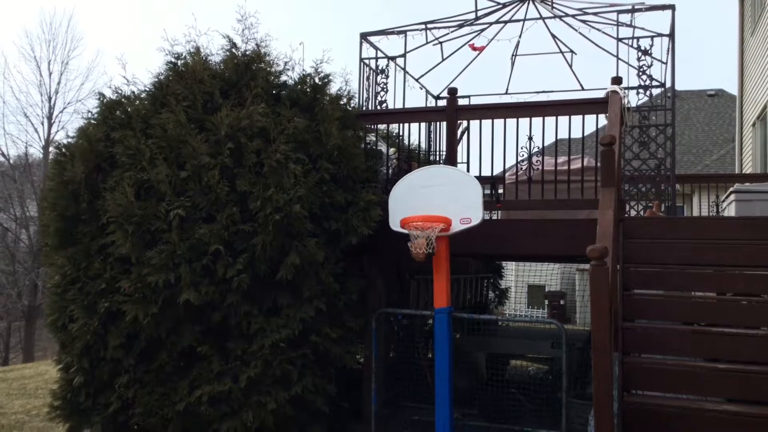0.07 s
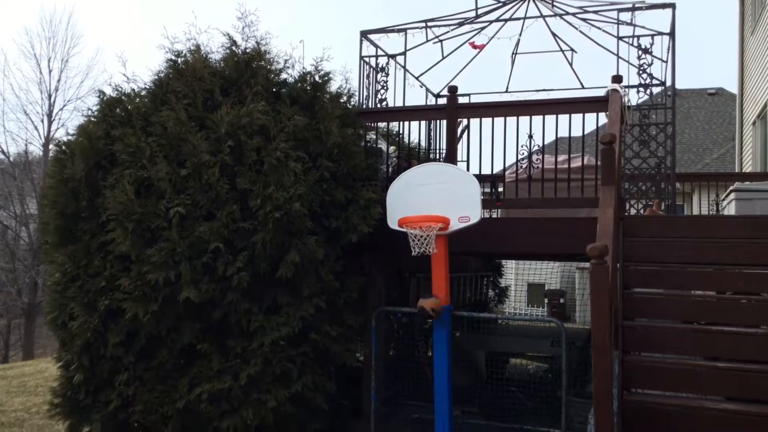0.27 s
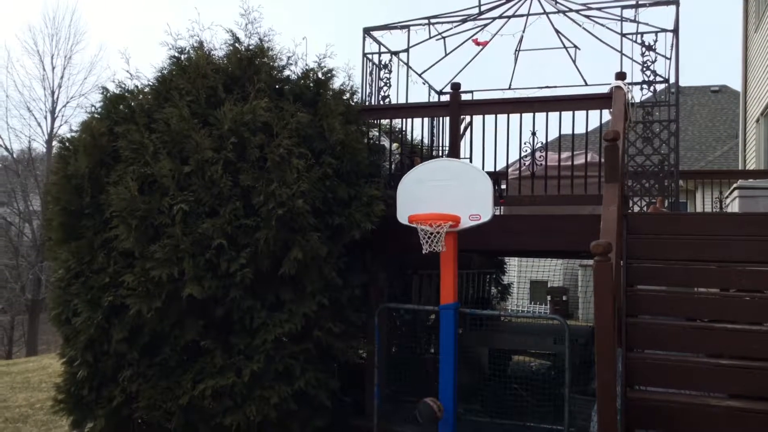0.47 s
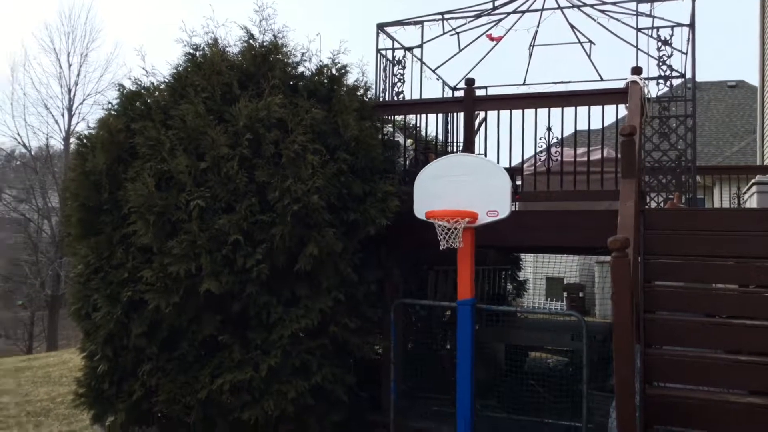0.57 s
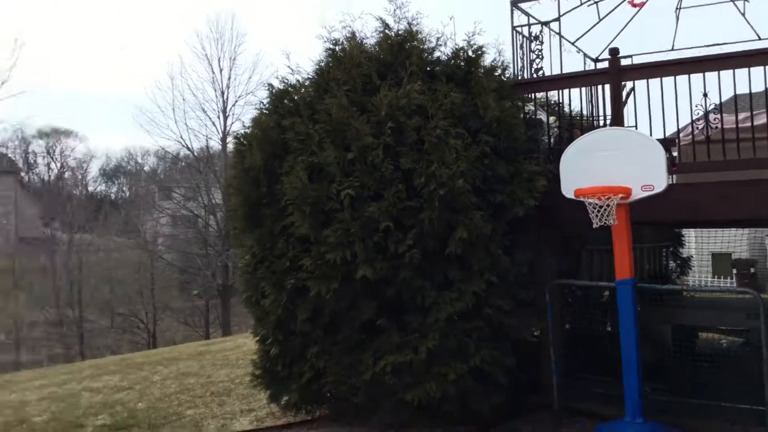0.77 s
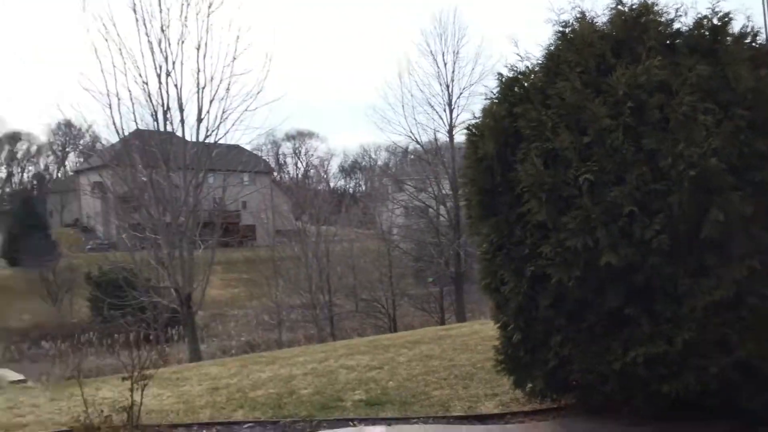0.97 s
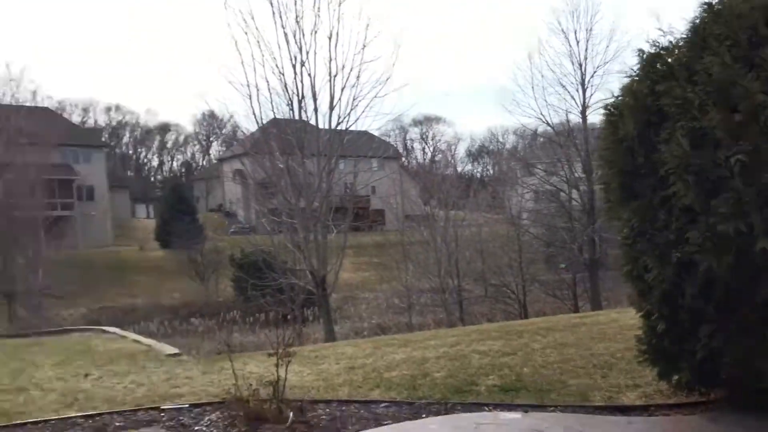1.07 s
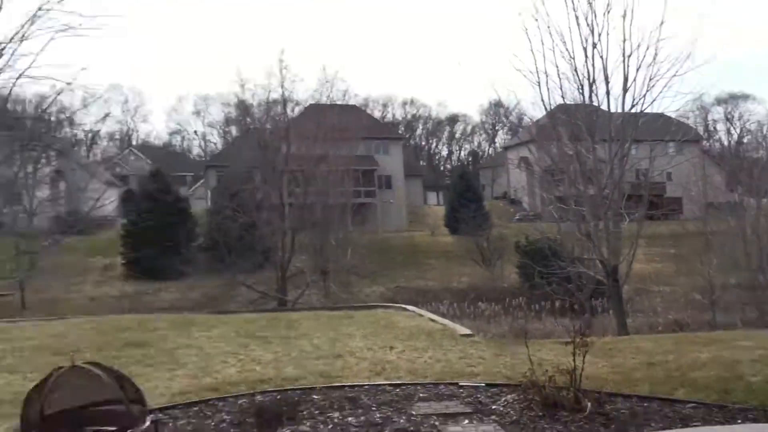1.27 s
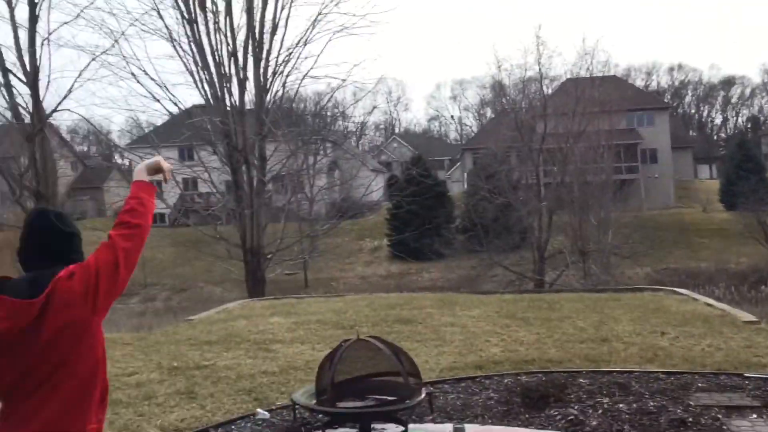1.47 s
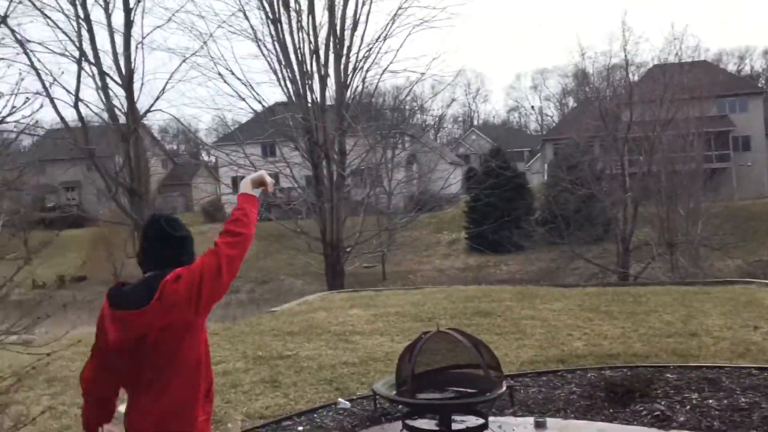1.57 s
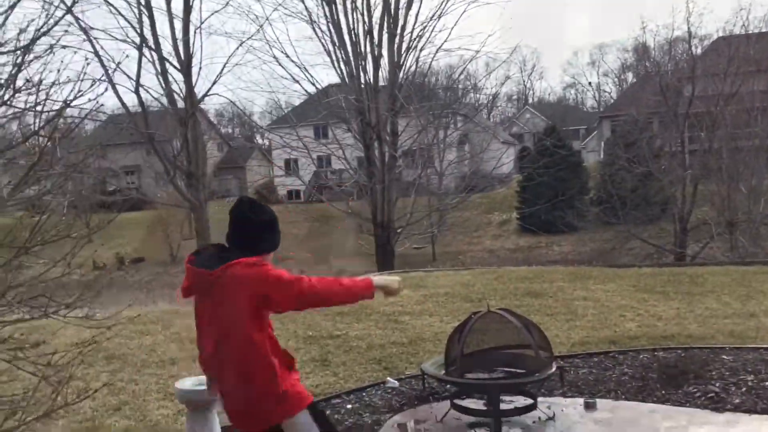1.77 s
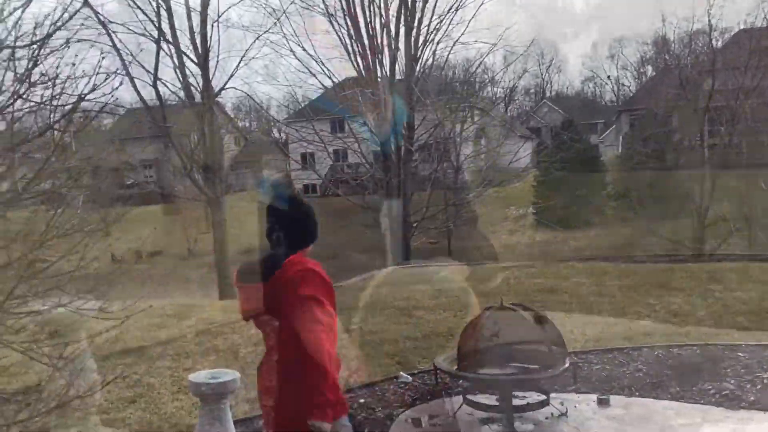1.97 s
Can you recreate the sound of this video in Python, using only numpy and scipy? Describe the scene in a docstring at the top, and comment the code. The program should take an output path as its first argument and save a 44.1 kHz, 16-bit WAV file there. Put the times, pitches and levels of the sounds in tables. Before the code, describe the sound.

A small ball bounces on a patio: a hollow plastic hoop booms and rattles, the ball knocks its post, then hits the paving hard and bounces three more times, softer, with gritty footsteps, in an open yard.

```python
"""Toy basketball bouncing on a patio

A small basketball drops from a hollow plastic hoop still rumbling from the shot, knocks its post and
bounces four times in an open yard, hard then softly: sagging thumps, crackling slaps, ringing modes.
House walls return low-passed copies; near and far reflections are clumped noise tails.
Clothes, shoes and grit are shaped noise over a low outdoor rumble with a faint tone.
"""
import sys
import numpy as np
from scipy import signal
from scipy.fft import rfft, irfft
from scipy.io import wavfile
from scipy.ndimage import uniform_filter1d

SR = 44100
rng = np.random.default_rng(int(sys.argv[2]) if len(sys.argv) > 2 else 0)


def materialize(psi):
    """Save the field psi as 16-bit PCM at rate SR to the path in sys.argv[1].

    A 1-D psi becomes a single channel; in a 2-D psi each row is a channel.
    """
    bounded = np.clip(np.atleast_2d(psi).T, -1, 1)
    quanta = np.round(bounded * 32767).astype(np.int16)
    wavfile.write(sys.argv[1], SR, quanta)


N = 89390  # samples


def amp(db):
    """Linear gain from dB."""
    return 10 ** (np.asarray(db) / 20)


def unit(x):
    """Scale to unit RMS."""
    return x / np.sqrt(np.mean(x ** 2) + 1e-20)


def read(points, hz):
    """Interpolate the second column over log frequency, holding the end values."""
    f, value = np.transpose(points)[:2]
    return np.interp(np.log(hz + 1), np.log(f), value)


def add(mix, s, sound):
    """Mix a sound in at s seconds, cut at the end of the mix."""
    part = mix[max(round(s * SR), 0):][:len(sound)]
    part += sound[:len(part)]


def colour(x, points):
    """Minimum-phase filter with the given spectrum (f/Hz, gain/dB)."""
    size = 4096
    gain_db = read(points, abs(np.fft.fftfreq(size, 1 / SR)))
    log_gain = np.log(amp(gain_db))
    fir = np.fft.ifft(np.exp(np.conj(signal.hilbert(log_gain)))).real
    return signal.fftconvolve(x, fir[:size // 2])[:len(x)]


def tail(bands):
    """Clumped random reflections, each band (f/Hz, level/dB, t60/s) dying at its own speed."""
    t, hz = np.arange(SR) / SR, np.fft.rfftfreq(SR, 1 / SR)
    clump_db = 2 * unit(uniform_filter1d(rng.standard_normal(SR), size=50))
    reflections = unit(amp(clump_db)) * rng.choice([-1., 1.], SR)
    spectrum = rfft(reflections) / np.sqrt(SR / 100)
    centres_hz = [row[0] for row in bands]
    out = np.zeros(SR)
    # triangular, overlapping bands in log frequency
    for share, (_, db, t60_s) in zip(np.eye(len(bands)), bands):
        weight = read(list(zip(centres_hz, share)), hz)
        out += irfft(spectrum * weight, SR) * amp(db - 60 * t / t60_s)
    return out


def ring(modes, rise_s=0.00025):
    """Struck modes (f/Hz, level/dB, t60/s): decaying sines of random phase."""
    t = np.arange(SR) / SR
    out = np.zeros(SR)
    for hz, db, t60_s in modes:
        out += amp(db - 60 * t / t60_s) * np.sin(2 * np.pi * (hz * t + rng.random()))
    return (1 - np.exp(-t / rise_s)) * out


def air():
    """Lumpy low outdoor rumble of shaped noise, a narrow-band wavering hum and a faint passing tone."""
    # rumble spectrum: f/Hz, relative density/dB per Hz
    rumble_spectrum = [(25, -40.5), (50, -10.5), (80, -6), (120, -3), (165, -10), (230, -17.5),
                       (420, -30.5), (800, -35), (1900, -42), (3100, -54), (6000, -61.5), (11000, -57.5),
                       (15000, -58)]
    # rumble level: t/s, level/dB
    rumble_level = [(0, -46.5), (1.0, -48.5), (1.5, -51), (2.03, -53)]
    hum_hz, hum_width_hz, hum_db = 107.5, 5.1, -1.5  # level relative to the whole wash
    tone_hz, tone_centre_s, tone_half_length_s, tone_db = 1006, 0.3, 0.15, -63.5
    swell_db = 0.7
    t, hz = np.arange(N) / SR, np.fft.rfftfreq(N, 1 / SR)
    wash_noise, hum_noise, swell_noise = rfft(rng.standard_normal((3, N)))

    slow = unit(irfft(swell_noise * np.exp(-(hz / 18) ** 2), N))
    swells = unit(amp(swell_db * slow))
    wash = unit(irfft(wash_noise * amp(read(rumble_spectrum, hz)), N))
    low = irfft(rfft(wash) / (1 + (hz / 400) ** 4), N)
    hum_band = np.exp(-((hz - hum_hz) / hum_width_hz) ** 2 / 2)
    hum = unit(irfft(hum_noise * hum_band, N))
    rumble = wash - low + swells * (low + amp(hum_db) * hum)  # only the low part swells

    tone_shape = np.exp(-((t - tone_centre_s) / tone_half_length_s) ** 4)
    tone = amp(tone_db) * tone_shape * np.sin(2 * np.pi * tone_hz * t)
    return amp(np.interp(t, *np.transpose(rumble_level))) * rumble + tone


def boom():
    """The flexing backboard's low boom sinks to its resting pitch as its swing dies down."""
    level_db, t60_s, rise_s = -29.5, 0.73, 0.023
    rest_hz, sag_hz, sag_s = 166.9, 56.6, 0.031
    t = np.arange(N) / SR
    phase = 2 * np.pi * np.cumsum(rest_hz + sag_hz * np.exp(-t / sag_s)) / SR
    return amp(level_db - 60 * t / t60_s) * (1 - np.exp(-t / rise_s)) * np.sin(phase)


def hoop():
    """Blows ring and rattle the hollow plastic stand; the falling ball knocks its post."""
    # blows: t/s, mode gain/dB, rattle gain/dB
    blows = [(.001, -42, -7.5), (.018, -33, -27), (0.144, -57, -45.5), (.646, -32, -19.5)]
    # hollow hoop modes: f/Hz, relative level/dB, t60/s
    hoop_modes = [(200.7, 3.5, 0.36), (244.3, -1, 0.28), (314, 5, 0.17), (335.5, -2.5, 0.25),
                  (365, 2, 0.27), (407, -6, 0.32), (558.2, -8, 0.24), (675, -16.5, 0.33), (805, -3, 0.14),
                  (859.5, -5, 0.11), (936, -5.5, 0.12), (1061, -14.5, 0.21), (1330, -18, 0.087)]
    # rattle bands: f/Hz, relative level/dB, t60/s
    rattle_bands = [(39.7, -2, .4), (80, 4.5, 0.67), (167, 27, 0.7), (361, 16, 0.52), (540, 14.5, 0.3),
                    (930, 10, 0.35), (2180, 1, 0.45), (4180, -3.5, 0.15), (7750, -13.5, 0.29),
                    (11200, -10.5, 0.14), (15500, -21, 0.21)]
    # dull knock bands: f/Hz, relative level/dB, t60/s
    knock_bands = [(45, -11, 0.22), (99.3, 21.5, 0.33), (243, 14, 0.35), (433, 9, 0.29), (650, 8, 0.11),
                   (1050, 3, 0.13), (1770, -6.5, 0.18), (2630, -9.5, 0.16), (3960, -12.5, 0.1),
                   (7500, -24, .1), (11300, -19.5, 0.17), (15200, -32, .1)]
    # hollow post modes: f/Hz, relative level/dB, t60/s
    post_modes = [(588, 3.5, 0.086), (665, 0.5, 0.11), (763, -11, .12), (1790, -2, 0.042),
                  (1870, -11, 0.071), (2417, -8, 0.031), (3490, -21, 0.066)]
    knock_s, knock_db, post_db, knock_rise_s = .3222, -9, -37.5, 0.0048
    out, t = np.zeros(N), np.arange(SR) / SR
    for s, modes_db, rattle_db in blows:
        add(out, s, amp(modes_db) * ring(hoop_modes) + amp(rattle_db) * tail(rattle_bands))
    knock = amp(knock_db) * tail(knock_bands) + amp(post_db) * ring(post_modes)
    add(out, knock_s, knock * (1 - np.exp(-t / knock_rise_s)))
    return out


def rustles():
    """Scuffs of shoes and cloth as swells of grainy noise, and grit ticks as filtered impulses."""
    # rustles: peak t/s, rise/s, fall/s, scrape level/dB, swish level/dB
    swells = [(0.082, 0.013, 0.026, -63, -57), (0.144, 0.0036, 0.0096, -53.5, -57.5),
              (0.211, 0.027, 0.044, -62.5, -61.5), (0.398, 0.0058, 0.011, -65, -63.5),
              (0.883, 0.0017, 0.0061, -60.5, -74.5), (.915, 0.018, 0.042, -78, -75),
              (1.172, 0.013, 0.02, -63.5, -75), (1.237, 0.016, 0.026, -64.5, -63.5),
              (1.633, 0.0075, 0.019, -63, -63.5), (1.785, 0.089, 0.028, -71, -74),
              (1.938, 0.014, 0.0051, -65.5, -75.5), (2.027, 0.0052, .01, -60, -61)]
    # grit ticks: t/s, impulse level before colouring/dB
    tick_events = [(.3925, -34.5), (1.2925, -45.5), (1.611, -46), (2.0, -49)]
    # scrape spectrum: f/Hz, relative gain/dB
    scrape_spectrum = [(150, -14), (600, 8.5), (1500, 7.5), (3000, -5), (5000, -15.5), (7400, -37),
                       (15500, -12)]
    # swish and tick spectrum: f/Hz, gain/dB
    swish_spectrum = [(1500, -13.5), (5000, 5), (7400, -3.5), (9500, 6), (12000, 10), (14000, 0),
                      (15500, -15)]
    grain_db = 2
    t = np.arange(N) / SR
    scrape, swish, ticks = np.zeros((3, N))
    for s, rise_s, fall_s, scrape_db, swish_db in swells:
        width_s = np.where(t < s, rise_s, fall_s)
        shape = np.exp(-abs((t - s) / width_s) ** 1.35 / 2)
        scrape += amp(scrape_db) * shape
        swish += amp(swish_db) * shape
    for s, db in tick_events:
        add(ticks, s, amp(db) * np.ones(1))
    grain = amp(grain_db * unit(uniform_filter1d(rng.standard_normal(N), size=90)))
    scrape_noise, swish_noise = grain * rng.standard_normal((2, N))
    scrape = scrape * unit(colour(scrape_noise, scrape_spectrum))
    swish = swish * unit(colour(swish_noise, swish_spectrum))
    return scrape + swish + colour(ticks, swish_spectrum)


def taps():
    """Gritty taps and crunches, mostly shoes on paving: noise bursts resonating at their own pitch."""
    # taps: t/s, relative level/dB, f/Hz, grit level relative to body/dB, t60/s
    tap_events = [(.208, -24, 2740, -13, 0.13), (.557, -24.5, 507, -12, 0.048),
                  (.578, -28.5, 790, -12, 0.032), (0.879, -24.5, 1740, -7, 0.043),
                  (0.91, -28.5, 860, -22, 0.095), (1.158, -32, 3010, -9, 0.034),
                  (1.18, -30.5, 1214, -2, 0.043), (1.199, -20, 726, -16, 0.058),
                  (1.223, -18.5, 1310, -5.5, 0.034), (1.245, -25.5, 1100, -0.5, 0.03),
                  (1.611, -30.5, 1270, -6, 0.052), (1.633, -20, 1370, -6, 0.039)]
    # grit spectrum: f/Hz, relative gain/dB
    grit_spectrum = [(400, 8), (1500, 15), (3300, 3), (5200, -33), (7400, -45), (15500, -15)]
    width_hz, rise_s = 220, 0.00096
    out, t = np.zeros(N), np.arange(SR // 5) / SR
    for s, db, hz, grit_db, t60_s in tap_events:
        grit = rng.standard_normal(len(t)) * rng.exponential(1, len(t))
        body = signal.lfilter(*signal.iirpeak(hz, hz / width_hz, fs=SR), grit)
        shape = amp(db - 60 * t / t60_s) * (1 - np.exp(-t / rise_s))
        add(out, s, 0.037 * shape * (unit(body) + amp(grit_db) * unit(colour(grit, grit_spectrum))))
    return out


def thump(hz, swell_s, decay_s, overtone_db):
    """A soft body pushes the air: a few low cycles sagging to hz, with an overtone at 1.5 times."""
    bend, bend_s, overtone_ratio = 0.31, 0.0079, 1.5  # starts 31 % sharp
    t = np.arange(SR // 2) / SR
    phase = 2 * np.pi * np.cumsum(hz * (1 + bend * np.exp(-t / bend_s))) / SR - np.pi / 2
    shape = (1 - np.exp(-(t / swell_s) ** 2)) * np.exp(-t / decay_s)
    tones = np.sin(phase) + amp(overtone_db) * np.sin(overtone_ratio * phase)
    return shape / shape.max() * tones


def steps():
    """Soft low thuds of feet, as quiet thumps."""
    # footfalls: t/s, level/dB, settled f/Hz
    footfalls = [(.280, -43, 185), (1.528, -38.5, 103), (1.93, -49, 169)]
    out = np.zeros(N)
    for s, db, hz in footfalls:
        add(out, s, amp(db) * thump(hz, swell_s=.011, decay_s=0.0069, overtone_db=-21.5))
    return out


def slap(bright_db, crackle_db):
    """A sharp first touch, then crackle while the rubber flattens on the grit."""
    # rubber on paving: f/Hz, relative gain/dB
    rubber_spectrum = [(100, -2), (400, -3), (900, 2.5), (1700, 3.5), (2800, -7.5), (5200, 1.5),
                       (7400, -11), (8700, 0.5), (12500, -7.5), (15500, -25)]
    contact_s = 0.0037
    t = np.arange(SR // 10) / SR
    grit = rng.choice([-1., 1.], len(t)) * rng.exponential(1, len(t))
    contact = amp(crackle_db) / 2 * grit * np.exp(-(t / contact_s) ** 4)
    contact[0] = 1  # first touch
    rubber = colour(contact, rubber_spectrum)
    return 0.36 * colour(rubber, [(2500, 0), (9000, bright_db)])


def ball():
    """Each bounce: thump, slap, ping of the air inside, near echo, scatter; walls return the lows."""
    # bounces: t/s, thump level/dB, settled thump f/Hz, thump swell/s, thump decay/s,
    # overtone relative level/dB, slap gain/dB, slap treble gain/dB, crackle relative level/dB,
    # ring gain/dB, low ping f/Hz, level/dB, high ping f/Hz, level/dB,
    # echo gain/dB, scatter gain/dB, scatter treble gain/dB
    bounces = [(0.6436, -9, 140.1, 0.0071, 0.018, -10.5, -3.5, 13, -34, -26.5, 1440, -28, 3730, -31.5, -13, -4, -6.5),
               (0.9875, -21, 167, 0.0071, 0.005, -6, -7, -1.5, -19, -33.5, 1537, -25, 2630, -33.5, -12, -16.5, -15.5),
               (1.351, -28.5, 122, 0.0057, .0081, -6, -13, -6.5, -9, -38, 2096, -28.5, 3360, -35, -9.5, -21, -12),
               (1.7061, -30, 124.7, 0.0041, 0.0078, -10, -10.5, -5, -14, -36.5, 1735, -35, 3970, -41, -5, -22, -19)]
    # modes of the air inside: f/Hz, relative level/dB, t60/s
    air_modes = [(343.5, -7.5, 0.13), (521, -13.5, 0.11), (752, -9.5, 0.042), (950, -10.5, 0.041),
                 (1230, -8, 0.056), (1339, -9.5, 0.072), (1494, -13.5, 0.018), (1717, -3, 0.051),
                 (1686, -1, 0.032), (1825, -14, .07), (2040, -17.5, 0.037), (2327, -15.5, 0.047),
                 (3297, -18, .04), (4730, -16, .02), (5720, -17, 0.034)]
    # scatter by deck and fence: f/Hz, relative level/dB, t60/s
    scatter_bands = [(120, 16, 0.28), (330, 17, 0.11), (674, 17, 0.1), (1470, 8, 0.19), (2670, -0.5, 0.15),
                     (5470, 1, 0.15), (7700, 1.5, 0.1), (8250, 4.5, .15), (11900, 10.5, .155),
                     (15400, -27.5, 0.095)]
    # reply of the yard: f/Hz, relative level/dB, t60/s
    yard_bands = [(120, 3, 0.67), (330, -16, 0.36), (690, -13.5, 0.68), (1570, -11.5, 0.34),
                  (4000, -19, 0.54), (7500, -19.5, 0.34), (11500, -13.5, 0.36), (15500, -36, .25)]
    # nearest reflection: f/Hz, gain/dB
    echo_spectrum = [(1800, -3), (4000, -4), (10000, -9)]
    ping_t60_s, ping_rise_s = 0.018, 0.00067
    echo_delay_s, near_fade_s, scatter_rise_s = .0097, 0.063, 0.0075
    wall_delay_s, wall_db, wall_cutoff_hz = 0.093, -17.5, 200
    out, t = np.zeros(N), np.arange(SR) / SR
    for (s, thump_db, hz, swell_s, decay_s, over_db, slap_db, bright_db, crackle_db, ring_db,
         low_hz, low_db, high_hz, high_db, echo_db, scatter_db, tilt_db) in bounces:
        add(out, s, amp(thump_db) * thump(hz, swell_s, decay_s, over_db))

        pings = [(low_hz, low_db, ping_t60_s), (high_hz, high_db, ping_t60_s)]  # of the spot that lands
        hit = amp(ring_db) * ring(air_modes) + ring(pings, ping_rise_s)
        add(hit, 0, amp(slap_db) * slap(bright_db, crackle_db))
        add(out, s, hit)
        add(out, s + echo_delay_s, amp(echo_db) * colour(hit, echo_spectrum))

        near = tail(scatter_bands) * np.exp(-(t / near_fade_s) ** 4)
        scatter = (near + tail(yard_bands)) * (1 - np.exp(-t / scatter_rise_s))
        add(out, s, amp(scatter_db) * colour(scatter, [(3000, 0.012), (12000, tilt_db)]))
    wall_filter = signal.butter(2, wall_cutoff_hz, fs=SR, output="sos")
    add(out, wall_delay_s, amp(wall_db) * signal.sosfilt(wall_filter, out))
    return out


def scene():
    """Sum of all sources, one channel."""
    return (air() + boom() + hoop() + rustles() + taps() + steps() + ball())[None]


def record(dry):
    """Band limit: linear-phase low-pass."""
    edge_hz = 15300
    low_pass = signal.firwin(255, edge_hz, window=("kaiser", 8), fs=SR)
    return signal.oaconvolve(dry, low_pass[None], "same")


dry = scene()
out = record(dry)
materialize(out)
```